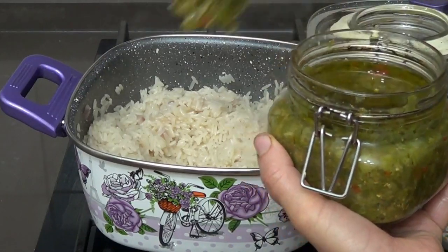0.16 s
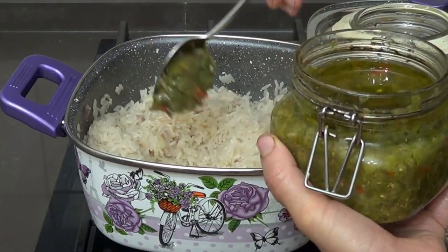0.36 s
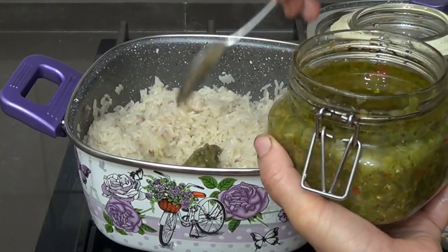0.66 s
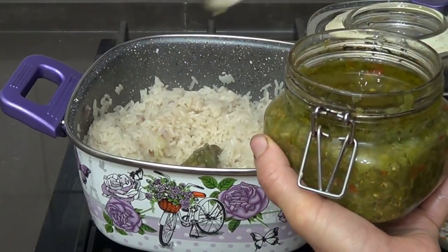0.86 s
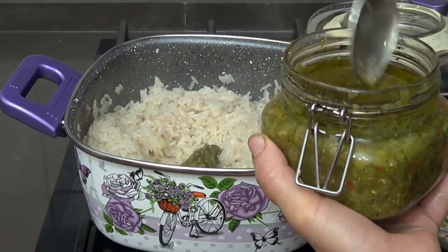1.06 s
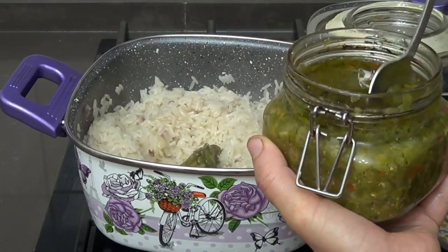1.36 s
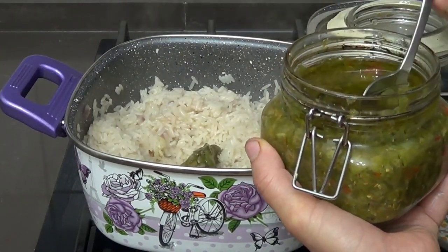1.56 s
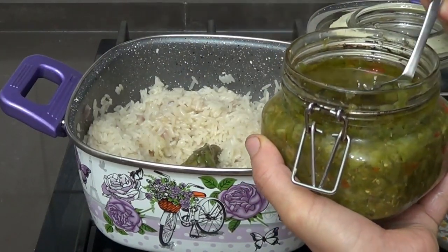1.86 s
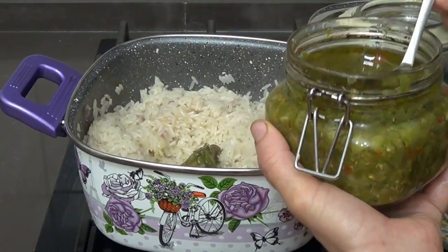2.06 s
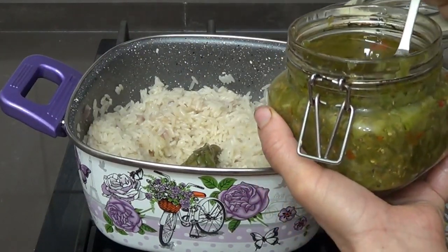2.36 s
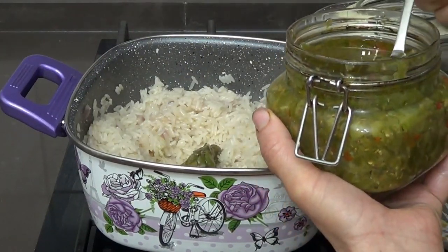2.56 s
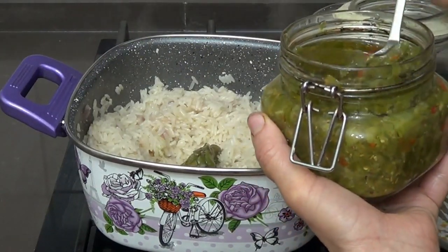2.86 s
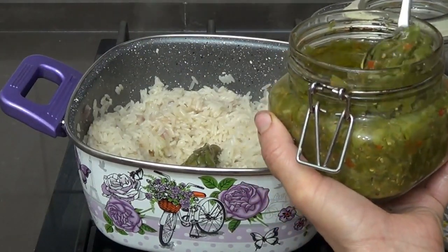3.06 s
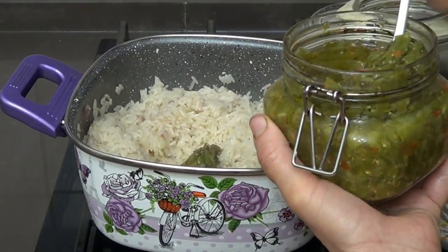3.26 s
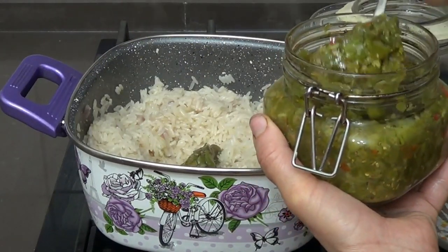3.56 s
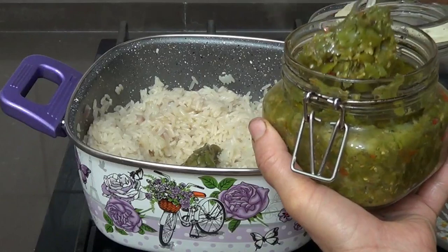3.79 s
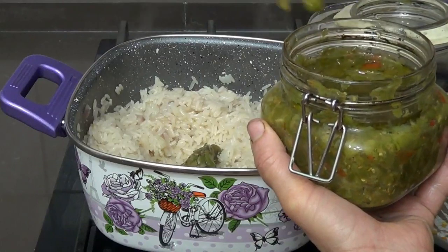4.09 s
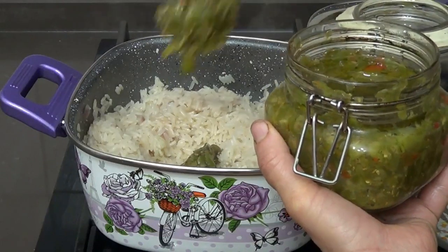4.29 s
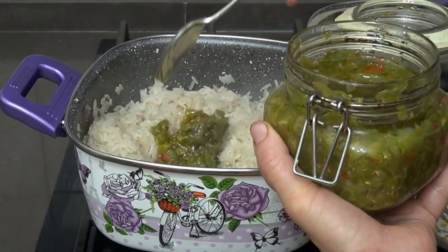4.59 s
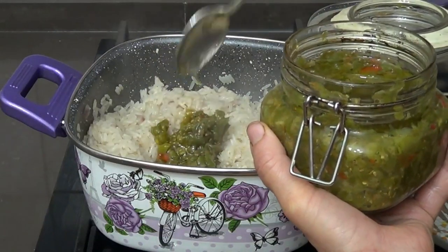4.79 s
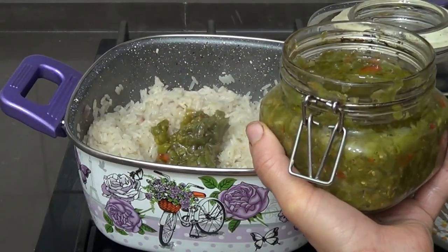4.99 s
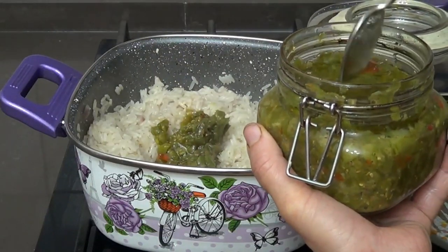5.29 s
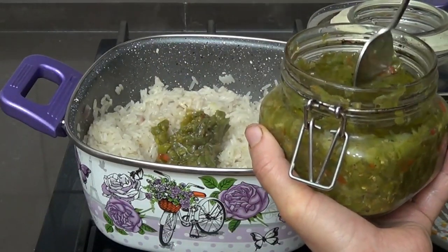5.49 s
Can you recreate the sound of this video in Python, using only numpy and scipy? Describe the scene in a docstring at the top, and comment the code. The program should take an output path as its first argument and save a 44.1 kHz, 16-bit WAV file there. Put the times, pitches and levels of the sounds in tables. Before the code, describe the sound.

Food sizzles steadily in a pot on a gas stove, a bright, fine crackle with occasional spits and pops over a soft flame flutter and faint hum. Close by, a metal spoon scoops relish from a glass jar with wet ticks, dull knocks and light clinks. A hollow bump comes later, and two quick taps on the glass near the end. The room is a small kitchen.

```python
"""Frying fish, spooning relish.

Fish sizzles in a covered pan on a gas stove in a small kitchen; an appliance hums. Thousands of tiny
steam bubbles burst in the oil; bigger ones spit, or pop and ring the pan and its lid. Close by, relish
is spooned from a glass jar: wet ticks, dull knocks, clinks, a scrape and a hollow bump, then two taps
of the spoon on the glass."""
import sys
import numpy as np
from scipy import signal
from scipy.fft import rfft, irfft, next_fast_len
from scipy.io import wavfile
from scipy.ndimage import uniform_filter1d

SR = 44100
rng = np.random.default_rng(int(sys.argv[2]) if len(sys.argv) > 2 else 0)


def wav_record(signal):
    """Record a signal, one row per channel, as 16-bit PCM in the file named by sys.argv[1]."""
    frames = np.transpose(np.atleast_2d(signal))
    bounded = np.clip(frames, -1, 1)
    # unit amplitude maps onto the largest positive 16-bit level
    quanta = np.round(bounded * 32767).astype(np.int16)
    wavfile.write(sys.argv[1], SR, quanta)


N = 248724
T = np.arange(N) / SR
ROOM_T60_S = 0.29
KNOCK_LO_HZ = 170


def amp(db):
    """Decibels to gain."""
    return 10 ** (np.asarray(db) / 20)


def unit(x):
    """Scale to rms 1."""
    return x / np.sqrt(np.mean(x ** 2))


def add(track, start_s, sound):
    """Mix a sound into a track."""
    start = max(int(start_s * SR), 0)
    track[start:start + len(sound)] += sound[:N - start]


def band(x, lo_hz, hi_hz, order):
    """Butterworth band-pass."""
    sos = signal.butter(order, [lo_hz, max(hi_hz, 1.1 * lo_hz)], "band", fs=SR, output="sos")
    return signal.sosfilt(sos, x)


def colour(x, points):
    """Filter by a curve of (Hz, dB) points."""
    hz, db = np.transpose(points)
    size = next_fast_len(len(x) + 4096)
    bins_hz = np.maximum(np.fft.rfftfreq(size, 1 / SR), 1)
    gain = amp(np.interp(np.log(bins_hz), np.log(hz), db))
    return irfft(rfft(x, size) * gain, size)[:len(x)]


def resonate(x, hz, width_hz):
    """One resonance, gain 1 at its centre."""
    return signal.lfilter(*signal.iirpeak(hz, hz / width_hz, fs=SR), x)


def fade(t, t60_s):
    """Exponential decay envelope."""
    return np.exp(-np.log(1000) * t / t60_s)


def ring(hz, t60_s):
    """A struck mode: a decaying sine."""
    t = T[:int(t60_s * SR) + 2]
    return np.sin(2 * np.pi * hz * t) * fade(t, t60_s)


def walk(rate_hz):
    """Smooth random drift, rms 1."""
    hold = int(SR / rate_hz)
    steps = np.repeat(rng.standard_normal(N // hold + 1), hold)
    return unit(uniform_filter1d(steps, hold)[:N])


def linger(power, t60_s):
    """Spread power into a decaying tail of the same energy."""
    pole = np.exp(-2 * np.log(1000) / (t60_s * SR))
    return signal.lfilter([1 - pole], [1, -pole], power)


def kitchen(x, near_db, room_db):
    """Direct sound, quick reflections off hob and tiles, then the room's tail."""
    t = T[:SR // 2]
    response = np.zeros(len(t))
    for db, t60_s in (near_db, 0.077), (room_db, ROOM_T60_S):
        tail = rng.standard_normal(len(t)) * fade(t, t60_s) * (t > 0.001)
        response += amp(db) * tail / np.linalg.norm(tail)
    response[0] = 1
    return signal.fftconvolve(x, response)[:N]


def crackle(per_s, spread_db, hiss_db, room_db):
    """Bubbles, mostly small, snap and hiss briefly; their echoes blur into noise."""
    bursting = rng.random(N) < per_s / SR
    size = amp(spread_db * np.minimum(rng.exponential(size=N), 6))
    snaps = unit(bursting * size * rng.choice([-1, 1], N))
    hiss_power = amp(2 * hiss_db) * linger(snaps ** 2, t60_s=0.0069)
    echo_power = amp(2 * room_db) * linger(snaps ** 2, ROOM_T60_S)
    return snaps + np.sqrt(hiss_power + echo_power) * rng.standard_normal(N)


def strays(per_s, db, hz, scatter_oct, spread_db=1.5):
    """Poisson events as rows of (s, dB, Hz)."""
    draws = rng.random((64, 3))
    starts_s = np.cumsum(-np.log(1 - draws[:, 0])) / per_s
    return [(s, db + spread_db * size, hz * 2 ** (scatter_oct * pitch))
            for s, (size, pitch) in zip(starts_s, 2 * draws[:, 1:] - 1) if s < N / SR]


def wash(hz):
    """Dull noise left by a soft blow, reaching a little above its pitch."""
    t = T[:SR // 2]
    noise = band(rng.standard_normal(SR), KNOCK_LO_HZ, 1.2 * hz, order=5)[-len(t):]
    attack = 1 - np.exp(-t / 0.0013)
    return unit(noise) * fade(t, t60_s=0.43) * attack


def sizzle(level_db, coarse_db):
    """Steam bubbles burst in flurries, by size; films of oil snap across all pitches."""
    # Band edges in Hz, one band per bubble size.
    edges_hz = [300, 3000, 5200, 7000, 8800, 11000, 17000]
    # Each row: frequency in Hz, gain in dB.
    spectrum = [(600, -18.5), (2700, -14), (4100, -13.5), (4750, -15.5), (5900, -7), (7500, -4),
                (8200, -0.2), (9000, 0), (9700, -3), (10900, -5), (12200, -11), (13300, -16.5),
                (14100, -14.5), (15800, -23.5)]
    coarse_top_hz = 7000
    bursts = amp(-7) * crackle(per_s=4400, spread_db=3, hiss_db=2, room_db=-11.5)  # oil films
    for lo_hz, hi_hz in zip(edges_hz, edges_hz[1:]):
        share = amp(0.74 * walk(110) + coarse_db * (hi_hz <= coarse_top_hz))
        bubbles = crackle(per_s=9000, spread_db=3, hiss_db=-3, room_db=-2)
        bursts += band(share * bubbles, lo_hz, hi_hz, order=6)
    flurry = amp(0.64 * walk(25.09) + 0.44 * walk(120))
    fizz = kitchen(flurry * bursts, near_db=-17, room_db=-10)
    return unit(colour(fizz, spectrum)) * amp(level_db)


def pan(level_db):
    """Coarse bubbling under the fish rings the pan, its lid and the air between."""
    # Each row: frequency in Hz, width in Hz, gain in dB.
    modes = [(278, 26.7, 2.5), (329.8, 6.8, 8), (380, 15, 0.5), (1094, 37, 2.5), (1177, 35, 2),
             (1633, 56, 1.5), (1906, 48, 6), (1920, 258, 4.5), (2117, 350, -2.5), (2953, 18, -4),
             (4090, 170, -5)]
    bubbling = crackle(per_s=1500, spread_db=3.5, hiss_db=-12, room_db=0.5)
    # Neighbouring modes swing against each other.
    body = sum((-1) ** k * amp(db) * resonate(bubbling, hz, width_hz)
               for k, (hz, width_hz, db) in enumerate(modes))
    return unit(body) * amp(level_db)


def frying(ring_db):
    """The boil drives the sizzle fully, the pan's ring only a little."""
    # Each row: time in seconds, boil strength in dB, coarse over fine bubbles in dB.
    boil = [(0.0, -34, 5.5), (0.06, -32, -3.5), (0.3, -35, 0.5), (0.54, -34, 1), (0.86, -36, 1.5),
            (0.94, -32, -2.5), (1.1, -35, 2.3), (1.26, -32, -0.5), (1.9, -32.0, -2.5), (2.02, -34, 1.8),
            (3.78, -34, -0.4), (3.9, -35.5, 2.5), (4.3, -32.5, -2.5), (4.4, -35, 3), (4.46, -32.5, 0),
            (4.92, -34, -0.8), (5.12, -31.5, -1.5), (5.64, -33, -1)]
    times_s, *curves = np.transpose(boil)
    boil_db, coarse_db = (np.interp(T, times_s, curve) for curve in curves)
    return sizzle(boil_db + 0.15, coarse_db) + pan(ring_db + 0.062 * (boil_db - boil_db.mean()))


def flame(level_db):
    """The gas flame flutters softly."""
    # Each row: frequency in Hz, gain in dB.
    spectrum = [(22, -24), (48, -4.5), (70, -6), (130, -3), (195, 1.5), (240, -6.5), (520, 0.5), (750, 0.5),
                (900, -5), (1500, -6), (4000, -15)]
    noise = unit(colour(rng.standard_normal(N), spectrum))
    return noise * amp(level_db + 3.3 * walk(6.1))


def appliances():
    """A motor's hum and rumble, and a thin electrical whine."""
    # Each row: time in seconds, hum level in dB.
    hum_levels = [(0, -67), (1.9, -64), (2.05, -91), (2.7, -77), (2.85, -68.5), (5.64, -71)]
    hum_hz, whine_hz = 95.5, 15625
    hum_phase = 2 * np.pi * np.cumsum(hum_hz + 0.7 * walk(8.2)) / SR
    rumble = amp(-7) * unit(band(rng.standard_normal(N), 35, 65, order=2))
    motor = (unit(np.sin(hum_phase)) + rumble) * amp(np.interp(T, *np.transpose(hum_levels)))
    return motor + amp(-71) * unit(np.sin(2 * np.pi * whine_hz * T))


def spits():
    """Single drops of oil burst with a bright ping, all near one pitch."""
    # Each row: start in seconds, level in dB.
    drops = [(0.0535, -22), (.17, -22.5), (0.524, -22), (2.819, -24), (4.494, -21)]
    ping_hz, scatter_oct = 8680, 0.082
    loud = [(s, db, ping_hz * 2 ** (scatter_oct * rng.uniform(-0.99, 1))) for s, db in drops]
    faint = strays(per_s=3, db=-24, hz=ping_hz, scatter_oct=scatter_oct)
    out = np.zeros(N)
    for s, db, hz in loud + faint:
        add(out, s, amp(db) * ring(hz, t60_s=0.0081))
    return kitchen(out, near_db=1, room_db=-17)


def rustles():
    """Swells of wet crackle, the later ones as the spoon digs into the relish."""
    # Each row: start in seconds, length in seconds, level in dB, centre in Hz.
    swells = [(0.153, 0.21, -53, 3400), (0.592, 0.12, -51, 3070), (2.14, 0.285, -44, 6200),
              (2.937, 0.35, -45, 6100)]
    edge_ratio, ramp_s = 2 ** 0.23, 0.026
    grains = crackle(per_s=1500, spread_db=4, hiss_db=6, room_db=0)
    out = np.zeros(N)
    for s, length_s, db, hz in swells:
        swell = np.clip(np.minimum(T - s, s + length_s - T) / ramp_s, 0, 1)
        out += amp(db) * swell * unit(band(grains, hz / edge_ratio, hz * edge_ratio, order=2))
    return out


def ticks():
    """Wet relish parts from the spoon with crisp snaps."""
    # Each row: start in seconds, level in dB, lower and upper band edge in Hz.
    snaps = [(.168, -38, 1700, 4800), (.212, -34, 900, 2400), (.279, -33, 1600, 4200),
             (.298, -33, 1900, 4800), (.618, -39, 1800, 4200), (1.291, -32.5, 1000, 4500),
             (1.817, -28.5, 1590, 2760), (3.197, -32.5, 1000, 2400), (4.681, -33, 600, 1600)]
    out, t = np.zeros(N), T[:SR // 20]
    for s, db, lo_hz, hi_hz in snaps:
        noise = unit(band(rng.standard_normal(len(t)), lo_hz, hi_hz, order=2))
        add(out, s, amp(db) * noise * fade(t, t60_s=0.022))
    return kitchen(out, near_db=-10, room_db=-8)


def knocks():
    """Soft handling blows: a thud, higher for harder contact, then a wash and a hollow ring."""
    # Each row: start in seconds, strength in dB, thud pitch in Hz, ring pitch in Hz.
    blows = [(0.221, -47.5, 388, 189), (.894, -40.5, 598, 355), (.994, -51, 320, 299),
             (2.094, -40.5, 343, 304.3), (2.333, -51, 380, 331), (2.358, -51.5, 380, 333),
             (3.106, -54, 342, 302), (3.15, -51, 378, 332), (4.036, -40.5, 400, 370), (4.68, -51, 393, 323)]
    out = np.zeros(N)
    for s, db, thud_hz, ring_hz in blows:
        thud = band(ring(thud_hz, t60_s=0.079), KNOCK_LO_HZ, 2 * thud_hz, order=2)
        hollow = ring(ring_hz, t60_s=0.22)
        rise = 1 - np.exp(-T[:len(hollow)] / 0.015)
        add(out, s, amp(db + 7) * thud)
        add(out, s, amp(db - 4) * wash(thud_hz))
        add(out, s, amp(db + 7.5) * hollow * rise)
    return out


def clinks():
    """The spoon touches the glass: a short clear note and a briefer one just above."""
    # Each row: start in seconds, level in dB, pitch in Hz.
    touches = [(.633, -41, 2850), (0.996, -32.5, 1680), (2.095, -33, 1690), (3.136, -39, 2780)]
    out = np.zeros(N)
    for s, db, hz in touches:
        add(out, s, amp(db) * ring(hz, t60_s=0.042))
        add(out, s, amp(db - 1) * ring(1.09 * hz, t60_s=0.018))
    return kitchen(out, near_db=-11, room_db=-9)


def pops():
    """Fat bubbles snap open under the lid; each cavity rings briefly."""
    # Each row: start in seconds, strength in dB, pitch in Hz.
    loud = [(2.017, -29.5, 1770), (3.109, -29, 1980), (4.547, -27, 1890)]
    faint = strays(per_s=2, db=-39.5, hz=2070, scatter_oct=0.5)
    out = np.zeros(N)
    for s, db, hz in list(loud) + faint:
        add(out, s, amp(db - 2) * ring(hz, t60_s=0.017))
        add(out, s, amp(db - 8) * ring(2.1 * hz, t60_s=0.0012))
    return kitchen(band(out, 600, 9000, order=1), near_db=-6, room_db=-3)


def scrape():
    """The spoon drags in the jar; stick-slip keeps one note singing."""
    start_s, length_s, hz = 2.875, 0.042, 1604
    t = T[:int(length_s * SR)]
    slips = 1 + 0.4 * walk(300)[:len(t)]
    out = np.zeros(N)
    add(out, start_s, amp(-41.5) * slips * np.sin(2 * np.pi * hz * t))
    return resonate(out, hz, width_hz=97)


def bump():
    """Something large and hollow is bumped once and booms in low modes."""
    # Each row: frequency in Hz, relative level in dB, T60 in seconds.
    modes = [(196, -3, 0.19), (420, -7, .4), (505, -8, .3), (580, -5, 0.59), (704, -1.5, 0.54),
             (829, -2, .38), (915, 0, 0.42), (980, 7.5, 0.052), (1094, -4, .4)]
    start_s = 4.025
    out = np.zeros(N)
    for k, (hz, db, t60_s) in enumerate(modes):
        add(out, start_s, (-1) ** k * amp(db - 39.5) * ring(hz, t60_s))
    add(out, start_s, amp(-43) * wash(hz=945))
    return out


def taps():
    """The spoon strikes the jar; relish and fingers damp the ring almost at once."""
    # Each row: start in seconds, strength in dB, lower and upper edge of the excited band in Hz.
    strikes = [(5.2511, -13, 623, 14000), (5.4255, -15, 1340, 3500)]
    # Each row: frequency in Hz, relative level in dB, T60 in seconds.
    jar_modes = [(696, -28, 0.19), (900, -29, 0.2), (1010, -23, 0.09), (1116, -31, .19),
                 (1370, -11, 0.0046), (1860, -8, 0.011), (2096, -13, 0.024), (2540, -7.5, 0.0045),
                 (6770, -16, 0.04), (8050, 3, 0.0023), (7910, -18, 0.078), (11100, -11, .014)]
    out = np.zeros(N)
    for s, db, lo_hz, hi_hz in strikes:
        glass = np.zeros(N)
        for hz, mode_db, t60_s in jar_modes:
            add(glass, s, amp(db + mode_db) * ring(hz, t60_s))
        out += band(glass, lo_hz, hi_hz, order=2)  # a glancing touch wakes only the middle modes
        # A tap that reaches the lowest mode thumps the body too.
        thump_gain = min(jar_modes[0][0] / lo_hz, 1) ** 2
        add(out, s, amp(db - 33) * thump_gain * wash(hz=430))
    return kitchen(out, near_db=-10, room_db=-5)


def scene():
    """Mid/side stereo: all sources lie ahead; scattered reflections make the sides differ."""
    # Each row: frequency in Hz, side gain in dB.
    width = [(40, -21), (90, -24), (180, -18.5), (350, -13.5), (700, -14), (1300, -9), (1900, -16),
             (3300, -12.5), (4600, -6.5), (5600, -12), (9500, -11.5), (12000, -16), (14000, -52)]
    # Each row: frequency in Hz, left minus right in dB.
    balance = [(100, .2), (1200, .5), (3000, .2), (6000, -.7), (10000, -.6), (13000, 0)]
    events = spits() + pops() + rustles() + ticks() + knocks() + bump() + clinks() + scrape() + taps()
    mid = frying(ring_db=-47) + flame(level_db=-51.5) + appliances() + events
    t = T[:SR // 10]
    scatter = rng.standard_normal(len(t)) * np.exp(-t / 0.042)
    echoes = amp(-2) * signal.fftconvolve(events, scatter / np.linalg.norm(scatter))[:N]
    # Steady sounds return from the walls uncorrelated; the flame spreads wider than the pan's ring.
    side = colour(frying(ring_db=-52) + flame(level_db=-44.5) + echoes, width)
    return np.array([colour(mid + sign * side, [(hz, sign * db / 2) for hz, db in balance])
                     for sign in (1, -1)])


def record(dry):
    """Steep elliptic low-pass."""
    top_hz = 15800
    return signal.sosfilt(signal.ellip(12, 0.1, 80, top_hz, fs=SR, output="sos"), dry)


dry = scene()
out = record(dry)
wav_record(out)
```